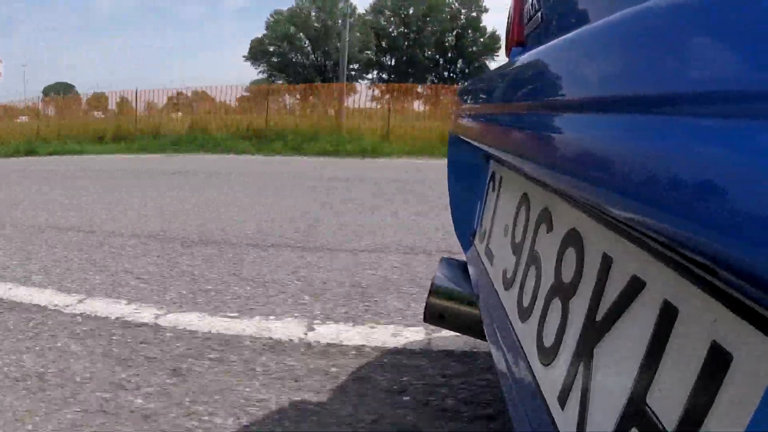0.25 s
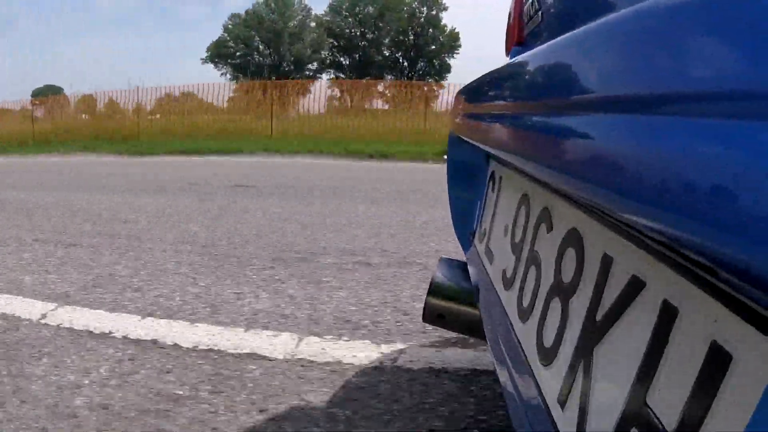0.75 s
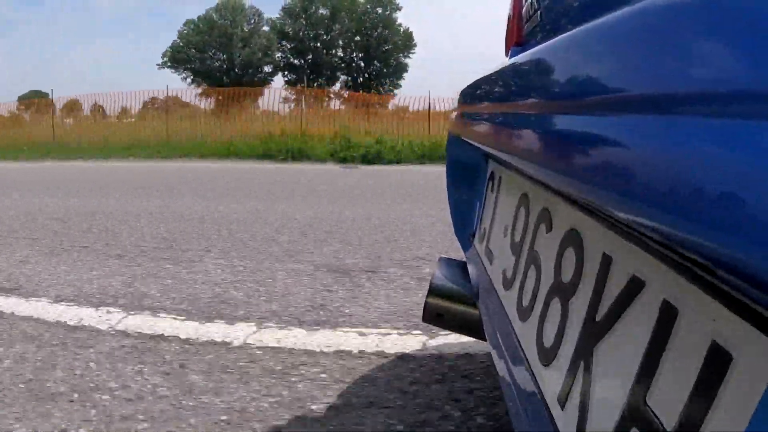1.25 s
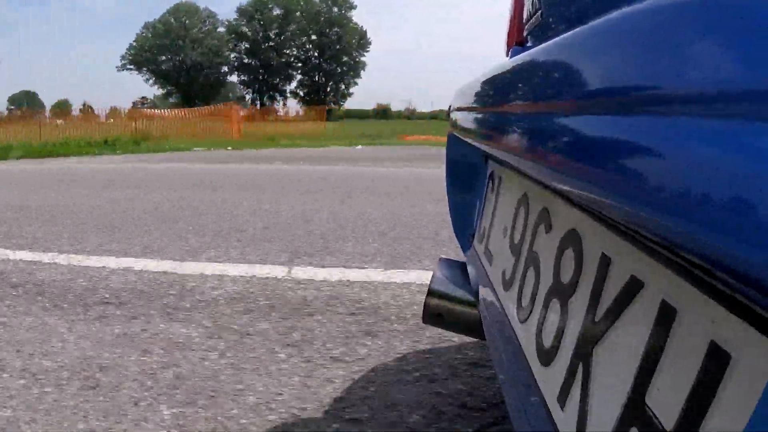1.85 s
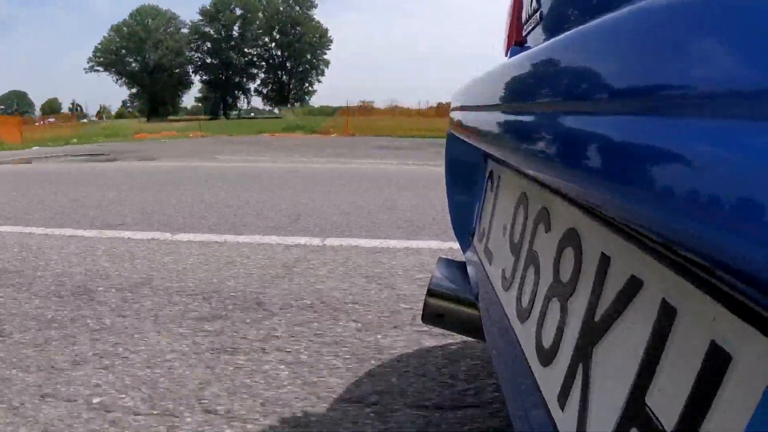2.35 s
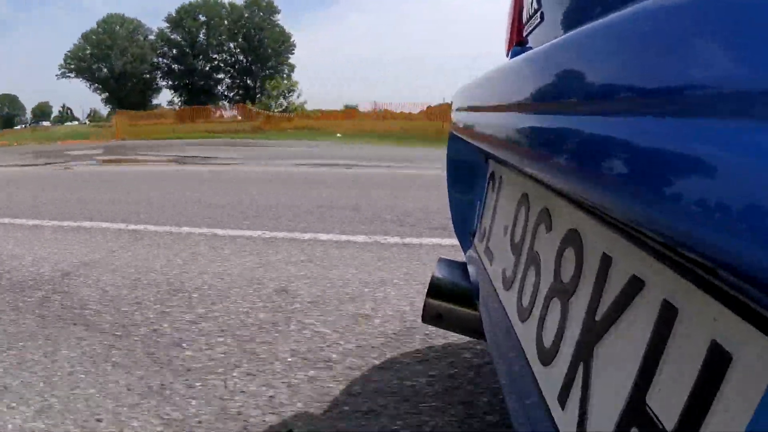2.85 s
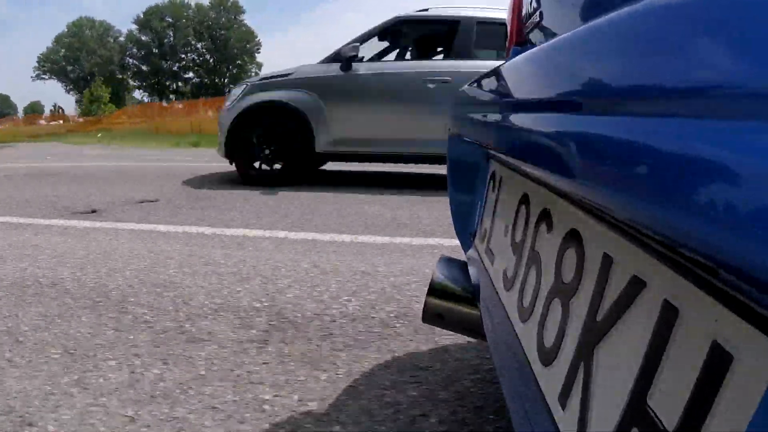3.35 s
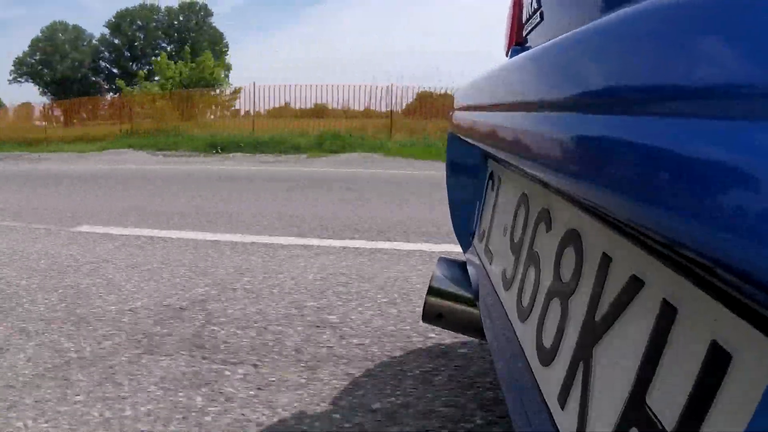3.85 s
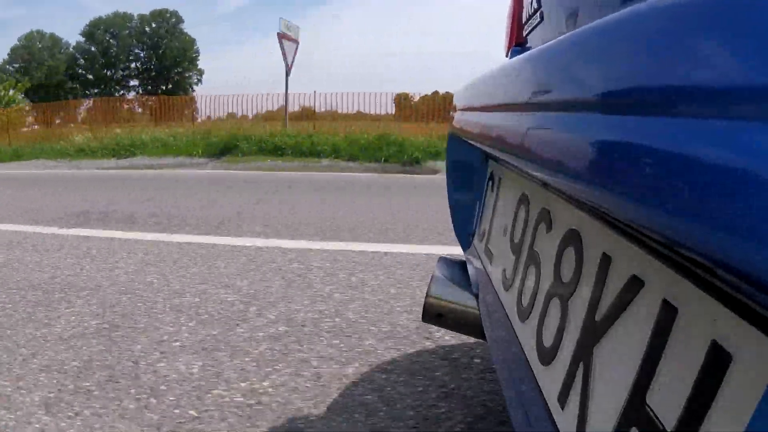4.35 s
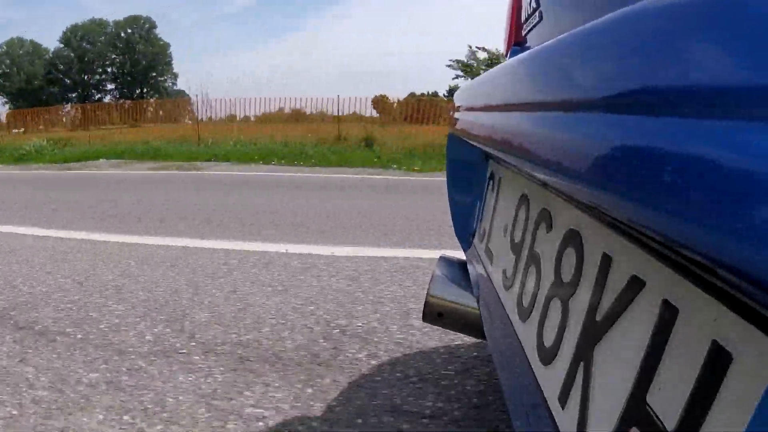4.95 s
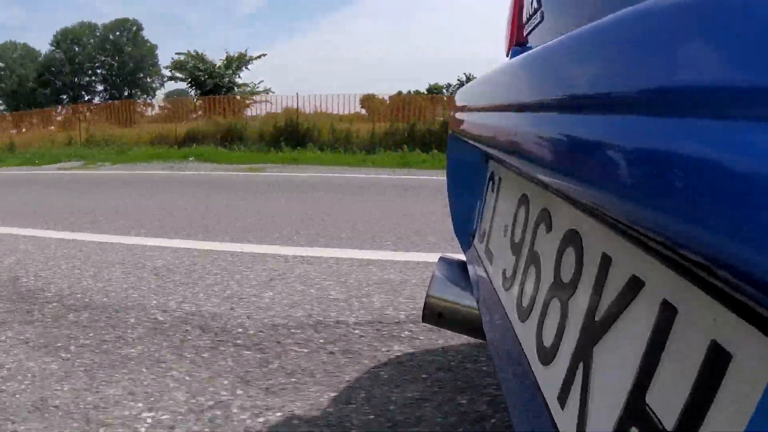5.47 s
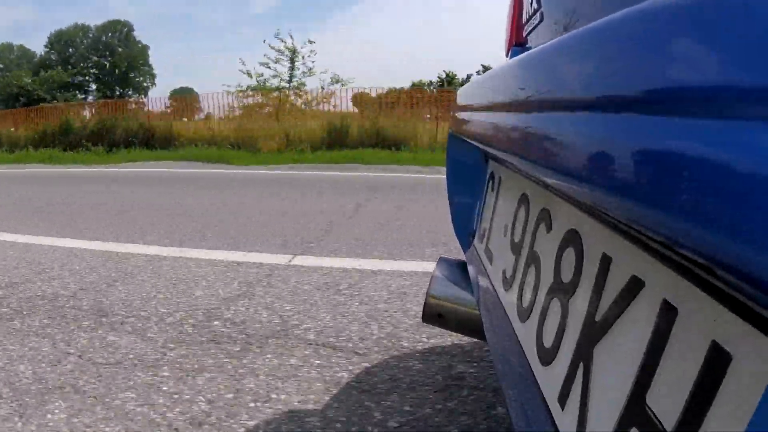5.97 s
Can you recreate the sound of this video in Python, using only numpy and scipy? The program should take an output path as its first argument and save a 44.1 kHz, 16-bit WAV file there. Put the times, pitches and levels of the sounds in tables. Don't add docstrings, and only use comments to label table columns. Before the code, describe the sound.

Close to the exhaust of a moving four-cylinder car: a raspy rev, a burst of loud pops and crackles, then a deep smooth hum.

```python
import sys
import numpy as np
from scipy import signal
from scipy.io import wavfile
from scipy.ndimage import uniform_filter1d

SR = 44100
rng = np.random.default_rng(int(sys.argv[2]) if len(sys.argv) > 2 else 0)


def digitize_waveform(pressure):
    field = np.atleast_2d(pressure).T
    bounded = np.clip(field, -1, 1)
    quanta = np.round(bounded * 32767).astype(np.int16)
    wavfile.write(sys.argv[1], SR, quanta)


def invert_db(x):
    u = np.asarray(x, float) / 20
    return 10 ** u


N = 273861
TIME_S = np.arange(N) / SR


def rms_one(x):
    return x / np.sqrt(np.mean(x ** 2) + 1e-20)


def in_time(rows):
    s, *columns = np.transpose(rows)
    return [np.interp(TIME_S, s, column) for column in columns]


def butter(x, hz, kind, order=2):
    sos = signal.butter(order, hz, kind, fs=SR, output="sos")
    return signal.sosfilt(sos, x + 1e-18)


def resonate(x, modes):
    out = 0
    for hz, width_hz, db in modes:
        r = np.exp(-np.pi * abs(width_hz) / SR)
        zeros = np.array([1, 0, -1]) * (1 - r * r) / 2
        poles = [1, -2 * r * np.cos(2 * np.pi * hz / SR), r * r]
        out = out + invert_db(db) * signal.lfilter(zeros, poles, x + 1e-18)
    return out


def noise():
    return rng.standard_normal(N)


def drift(hz):
    return rms_one(butter(rng.standard_normal(N + SR), hz, "low")[SR:])


def clicks_at(seconds, sizes):
    out = np.zeros(N)
    samples = (np.asarray(seconds) * SR).astype(int)
    np.add.at(out, np.clip(samples, 0, N - 1), sizes)
    return out


def fade(clicks, t60_s):
    return signal.lfilter([1], [1, -invert_db(-60 / (t60_s * SR))], clicks + 1e-18)


def front(clicks, spike_s):
    echo_s, echo_db = .00103, -5.7
    t = np.arange(400) / SR
    spike = (t / spike_s) ** 2 * np.exp(2 - 2 * t / spike_s)
    loop = np.zeros(round(echo_s * SR) + 1)
    loop[0], loop[-1] = 1, -invert_db(echo_db)
    shape = signal.lfilter([1], loop, butter(spike, 2400, "low", order=3))
    return signal.fftconvolve(clicks, shape)[:N]


def crack(clicks, envelope, hiss_db):
    hiss = invert_db(hiss_db) * envelope * noise()
    return butter(clicks + hiss, 4100, "high", order=3)


STATES = {"pull": (-16, 0.5, -19.5, -30.5, -14, -6.5, 0.0346, -10),
          "ease": (-20, -4.5, -22.5, -21, -16, -3.5, 0.26, -11),
          "lift": (-4, -1, -23, -12.5, -20, -26, 0.08, -30),
          "misfire": (-4.5, -2.5, -11, -16, -15.5, -13, 0.43, -24),
          "stumble": (-3.5, -6.5, -12.5, -13.5, -15, -10, 0.75, -9.5),
          "tip in": (-25, -1.5, -13.5, -17, -11.5, -6.5, 0.22, -10),
          "catch": (-9, -2, -7, -11, -15, -20, 0.34, -22),
          "overrun": (-9, 0, -8, -28, -21.5, -24.5, 0.02, -33)}
# start in seconds, state name.
PHASES = [(0, "pull"), (.91, "ease"), (1.235, "lift"), (1.73, "misfire"), (2.31, "lift"), (2.58, "misfire"),
          (3.35, "stumble"), (3.815, "tip in"), (4.115, "misfire"), (4.36, "catch"), (4.54, "overrun")]


def engine_state():
    change_s = .04
    s, names = zip(*PHASES)
    now = np.searchsorted(s, TIME_S, "right") - 1
    columns = np.array([STATES[name] for name in names])[now].T
    return uniform_filter1d(columns, size=int(change_s * SR), axis=1)


# order, leading order, level in dB re the leader.
MINOR_ORDERS = [(1, 4, -29), (2, 4, -34), (9, 7, -5), (10, 5, -12), (11, 4, -41.5), (12, 8, -11)]
# frequency in Hz, width in Hz, level in dB.
BURBLE = [
    (149.3, 32.6, 17.5),
    (113, 20, -26),
    (285, 30, -18.5),
]


def drone(cycles, levels_db, share):
    sway_db, order_step_rad = .5, 2.42
    orders = list(levels_db.items())
    orders += [(k, levels_db[lead] + db) for k, lead, db in MINOR_ORDERS]
    tones = 0
    for k, db in orders:
        sine = -np.sin(2 * np.pi * k * cycles + order_step_rad * (k % 4))
        tones = tones + invert_db(db + sway_db * drift(6)) * np.sqrt(2) * sine
    whole = np.sqrt(sum(invert_db(db) ** 2 for db in levels_db.values()))
    rumble = butter(resonate(noise(), BURBLE), 420, "low", order=4)
    burble = rms_one(rumble * invert_db(2.0 * drift(12)))
    return np.sqrt(1 - share) * tones + np.sqrt(share) * invert_db(1.5) * whole * burble


# level in dB, lag in seconds.
CYLINDERS = [(3, 0), (-2.5, .00022), (1, -.0001), (2, .00012)]
# frequency in Hz, width in Hz, level in dB.
PIPE = [
    (958, 44, 8.5),
    (1720, 380, -13),
    (690, 220, 3.5),
    (3050, 170, -50.5),
]


def bark(cycles, level_db, share):
    weak_firing_db = -30
    count = np.floor(4 * cycles + .24).astype(int)
    fired = np.flatnonzero(np.diff(count))
    luck = rng.standard_normal((len(fired), 2))
    sizes_db, lag_s = np.array(CYLINDERS)[count[fired] % 4].T
    sizes_db = sizes_db + weak_firing_db * share[fired] * rng.random(len(fired))
    clicks = clicks_at(fired / SR + lag_s, invert_db(sizes_db + 0.42 * luck[:, 0]))
    bright = clicks_at(fired / SR + lag_s, invert_db(sizes_db + 1.9 * luck[:, 1]))

    body = butter(front(clicks, spike_s=.00018), 400, "high")
    body = body + resonate(body, [(1130, 150, 1.0), (686, 92, 0.5), (2350, 87, 8), (3185, 83, 3.5)])
    rasp = butter(resonate(noise() * fade(clicks, 0.018), PIPE), 3600, "low")
    low = rms_one(body) + invert_db(-21) * rms_one(rasp)

    top = butter(crack(bright, fade(bright, 0.017), hiss_db=6.0), [5500, 8200], "band")
    sizzle = resonate(bright + noise() * fade(bright, 0.011), [(3770, 700, 0)])
    top = top + invert_db(-6) * rms_one(sizzle) * top.std()

    dull = butter(low, 1350, "low", order=4)
    dull = rms_one(dull + resonate(dull, [(934, 370, 1.4)]))
    fullness = np.minimum(invert_db(1.7 * (level_db + 22.5)), 1)
    full = low + invert_db(-28.0) * rms_one(top)
    return invert_db(level_db) * ((1 - fullness) * dull + fullness * full)


# time in seconds, four-stroke cycles per second.
SPEED = [(0, 35.9), (.15, 37.1), (.66, 40.5), (.8, 40.1), (1.05, 40.7), (1.25, 40.2), (1.68, 39.6),
         (2, 40.6), (2.3, 38.7), (2.55, 37.8), (3.3, 36.7), (3.9, 36.3), (4.2, 35.7), (4.65, 35.1),
         (4.8, 34.8), (6.0, 31), (6.21, 30.5)]
# time in seconds, level in dB.
NOTE = [(0, -12.5), (.72, -12.5), (.92, -16), (1.05, -22), (1.2, -22.5), (1.27, -13.5), (1.65, -11.5),
        (1.76, -18.5), (2.3, -20.5), (2.45, -15.5), (2.567, -18.5), (3.5, -25.5), (3.7, -22), (4.08, -19),
        (4.25, -25), (4.45, -17.5), (4.8, -13.5), (6.21, -10.5)]


def engine():
    cycles = np.cumsum(in_time(SPEED)[0]) / SR
    note_db, = in_time(NOTE)
    *orders_db, share, bark_db = engine_state()
    share = np.clip(share, 0, 1)
    levels_db = dict(zip((3, 4, 5, 6, 7, 8), note_db + orders_db))
    return drone(cycles, levels_db, share) + bark(cycles, note_db + bark_db, share)


def boom(clicks):
    trough_s, silencer_hz = 0.00483, 178
    t = np.arange(3000) / SR - .0012
    late = np.maximum(t - trough_s, 0)
    swing = 2.5 * np.sin(2 * np.pi * silencer_hz * late) * np.exp(-late / 0.0013)
    trough = (t > 0) * (late == 0)
    return signal.fftconvolve(clicks, butter(swing - trough, 920, "low"))[:N]


# time in seconds, peak in dB, crack in dB re the bang.
BANGS = [(1.345, -23, -28), (1.6628, -27, -19), (1.6705, -23.5, -8), (1.7203, -4.5, -11),
         (1.729, -4, -16), (1.749, -22, -7), (1.8137, -12, -9.5), (1.8835, -3.5, -10),
         (1.8965, -10, -29), (1.8998, -11, -10.5), (1.9672, -17.5, -7), (2.0519, -7.5, -9.5),
         (2.0544, -4.5, -12), (2.0605, -6.5, -22.5), (2.1474, -7, -9), (2.2183, -6, -9),
         (2.2248, -12.5, -14), (2.2355, -8, -13), (2.2576, -16.5, -10.5),
         (2.5669, -42, -2.5), (2.626, -3, -6), (2.6316, -8, -11), (2.7098, -25.5, -14),
                 (2.7739, -25.5, -10), (2.8053, -15, -10.5), (2.8704, -13.5, -8.5), (2.8912, -23.5, -12),
                 (2.9052, -15.5, -20), (2.9657, -13.5, -10.5), (3.0318, -12.5, -12.5), (3.0377, -14.5, -13),
                 (3.1068, -25, -10), (3.1129, -12, -12), (3.1276, -8, -15), (3.1984, -22, -15),
                 (3.2027, -23.5, -11), (3.238, -34, -10), (3.2914, -12.5, -6.5), (3.2931, -4, -12.5),
                 (3.2958, -9, -11.5), (3.2969, -9, -18), (3.3013, -12.5, -19), (3.3698, -23, -16),
                 (3.7684, -9, -11.5)]
# time in seconds, boom in dB.
THUDS = [(1.813, -6.5), (1.9681, -10), (3.1975, -16), (3.2924, -12), (3.603, -26), (3.659, -20.5),
         (3.7689, -10.5), (4.121, -21), (4.435, -23), (4.488, -12.5)]


def pops():
    boom_db, boom_top_db = 0.5, -11.5
    thud_front_db, lead_s = -15, .00015
    s, peak_db, crack_db = np.transpose(BANGS)
    thud_s, thud_db = np.transpose(THUDS)
    clicks = clicks_at(s - lead_s, invert_db(peak_db)) + clicks_at(thud_s, invert_db(thud_db + thud_front_db))
    pushes = clicks_at(s, invert_db(np.minimum(peak_db + boom_db, boom_top_db)))
    pushes += clicks_at(thud_s, invert_db(thud_db))
    bright = clicks_at(s - lead_s, invert_db(peak_db + crack_db))

    out = invert_db(4.5) * front(clicks, spike_s=.00013) + invert_db(-4) * boom(pushes)
    hiss_envelope = fade(bright, 0.013) + invert_db(-32.0) * fade(bright, 0.27)
    out += invert_db(9.5) * crack(bright, hiss_envelope, hiss_db=-13.0)
    tail = noise() * (fade(clicks, 0.028) + invert_db(-21.0) * fade(clicks, 0.11))
    tail = resonate(tail, PIPE + [(331, 97, 11.0), (646, 82, 2.3)])
    return out + invert_db(-4.5) * butter(tail, 2600, "low"), clicks


# frequency in Hz, level in dB, t60 in seconds.
TING = [(4091, -52, .75), (4942, -50, .7), (5496, -52, .45), (6778, -52, .2), (8893, -55, .25),
        (9370, -59, .15)]


def ting():
    t = np.maximum(TIME_S - .852, 0)
    return sum(invert_db(db - 60 * t / t60_s) * np.sin(2 * np.pi * hz * t) for hz, db, t60_s in TING)


# time in seconds, tyre roar in dB, wind in dB.
ROAD = [(0, -28.5, -43.5), (1.1, -36, -32), (1.5, -33.5, -27), (2.2, -41, -25), (2.5, -38.5, -35),
        (3.6, -42, -31), (4.85, -35.5, -33.5), (5.5, -37, -24.5), (6.21, -35, -28)]
# frequency in Hz, density in dB per Hz.
ROAR = [(330, 0), (440, -7.5), (560, -4), (680, -5.5), (930, -7), (1200, -7.5), (1450, -12.5), (2500, -24),
        (4000, -34.5), (5500, -43.5), (7000, -41), (11000, -63.5)]


def road():
    gust_db, gust_hz = 1.5, 1.3
    roar_db, wind_db = in_time(ROAD)
    hz, db = np.transpose(ROAR)
    white = rng.standard_normal((2, N))
    edges = 330 * 2 ** np.arange(0, 5.1, 1 / 3)
    roar = 0
    for k, (low, high) in enumerate(zip(edges, edges[1:])):
        level_db = np.interp(np.log(low * high) / 2, np.log(hz), db)
        roar = roar + invert_db(level_db + 0.47 * drift(32)) * butter(white[k % 2], [low, high], "band")
    wind = butter(noise(), [33, 62], "band") * invert_db(2.5 * drift(6))
    gusts = invert_db(wind_db + gust_db * drift(gust_hz))
    return invert_db(roar_db - 0.5) * rms_one(roar) + gusts * rms_one(wind)


def gain_control(clicks):
    clamp_s, clamp_db, recover_s, clamp_hz = 2.567, -22.5, 0.34, 120
    since = TIME_S - clamp_s
    clamp = clamp_db * (since > 0) * np.exp(-np.abs(since) / recover_s)
    dips = 1 + 1.06 * butter(fade(clicks, 0.21), 170, "low")
    return invert_db(butter(clamp, clamp_hz, "low", order=1)) / dips


def scene():
    bangs, clicks = pops()
    steady = engine() + ting() + road()
    return (bangs + gain_control(clicks) * steady)[None]


def band_limit(x):
    return signal.sosfilt(signal.butter(12, 15100, fs=SR, output="sos"), x)


def record(dry):
    x = 1.3 * np.tanh(dry / 1.3)
    port_hz, port_width_hz, port_db = 6400, 800, 7
    x = x + resonate(x, [(port_hz, port_width_hz, port_db)])
    x = butter(x, 5950, "low", order=3)
    x = butter(x, 13000, "low", order=4)
    return band_limit(x)


dry = scene()
out = record(dry)
digitize_waveform(out)
```